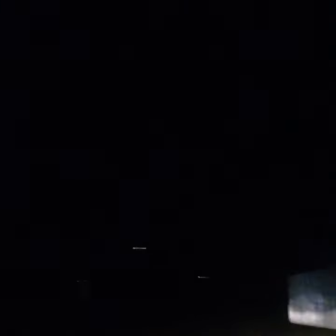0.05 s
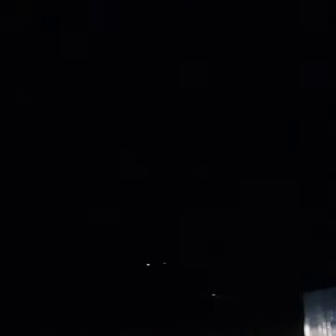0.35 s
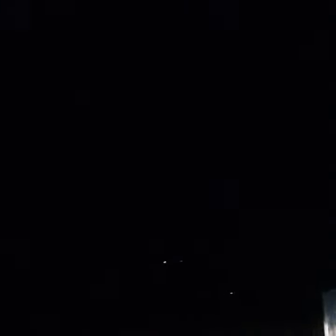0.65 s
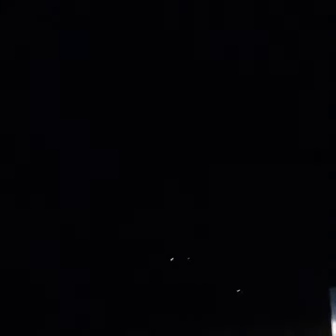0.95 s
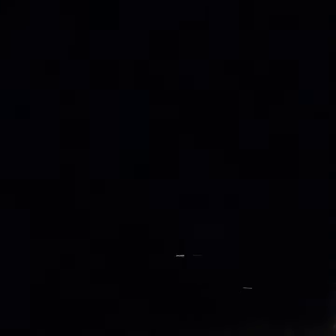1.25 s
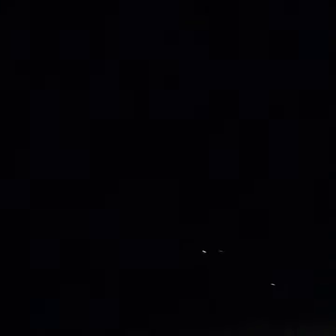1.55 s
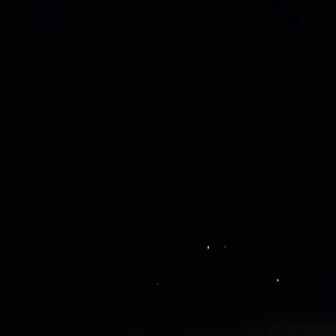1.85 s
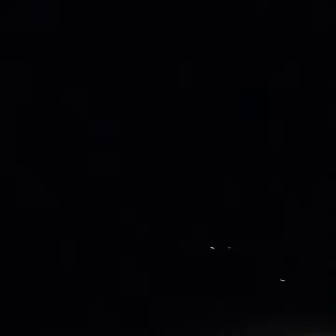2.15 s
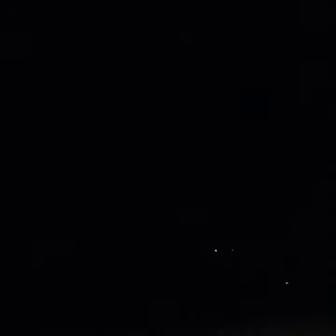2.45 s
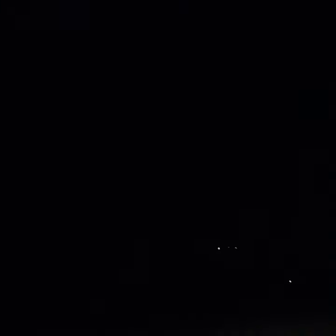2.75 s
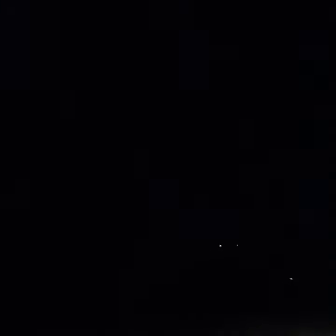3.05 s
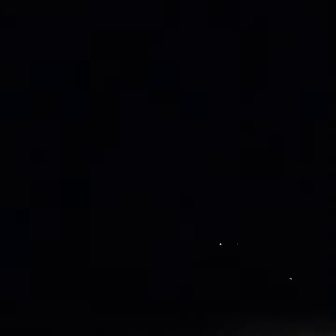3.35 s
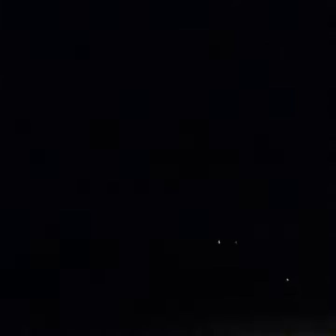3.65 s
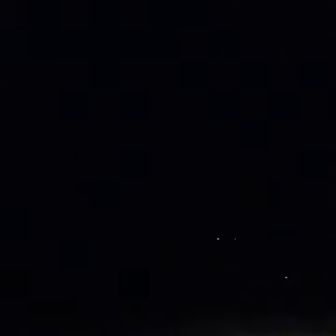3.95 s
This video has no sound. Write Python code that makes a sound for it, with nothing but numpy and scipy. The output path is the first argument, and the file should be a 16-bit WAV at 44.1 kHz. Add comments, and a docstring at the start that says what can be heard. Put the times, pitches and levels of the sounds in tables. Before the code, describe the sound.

A helicopter flies low at night, its rotor blades beating rapidly over a low roar.

```python
"""A rotorcraft flies low at night, some way off over open ground, its blades beating about 21 times a second.
Each blade cuts the wavering tip vortices in a burst of slaps, with a low thud and a deep thump close
behind; a square hit gives a hard crack. The ground reflects and scatters the beats. Behind them churned
air roars and a turbine rush fades, while faint hiss and ticks lie close to the microphone."""
import sys
import numpy as np
from scipy import signal
from scipy.fft import rfft, irfft
from scipy.io import wavfile

SR = 44100
rng = np.random.default_rng(int(sys.argv[2]) if len(sys.argv) > 2 else 0)


def materialize(psi):
    """Save the field psi as 16-bit PCM at rate SR to the path in sys.argv[1].

    A 1-D psi becomes a single channel; in a 2-D psi each row is a channel.
    """
    bounded = np.clip(np.atleast_2d(psi).T, -1, 1)
    quanta = np.round(bounded * 32767).astype(np.int16)
    wavfile.write(sys.argv[1], SR, quanta)


N = 176400

# Strength of each part of the blade beat over time: time_s, relative_level_db
THUMP_LEVELS = [(0.04, -20), (0.57, -23), (0.71, -23), (0.81, -24.5), (1.44, -24), (1.68, -27),
                (1.72, -19.5), (1.92, -23.5), (2.16, -22), (2.3, -23.5), (2.4, -21), (2.69, -35.5),
                (2.78, -21.0), (2.88, -36), (3.03, -17), (3.17, -40), (3.22, -34.5), (3.51, -32.5),
                (3.9, -21), (3.99, -2)]
THUD_LEVELS = [(0.04, -23), (0.57, -20.5), (0.62, -25), (0.86, -17.5), (1.24, -18.5), (1.29, -28),
               (1.48, -26), (1.53, -21.5), (2.06, -30), (2.11, -23), (2.35, -46), (2.4, -28), (2.74, -17.5),
               (2.88, -41.5), (3.22, -20.5), (3.9, -28), (3.94, -36), (3.99, -32)]
SLAP_LEVELS = [(0.04, -23.5), (0.09, -27), (0.14, -26), (0.33, -21.5), (0.86, -19.5), (0.91, -20.5),
               (1.049, -21.5), (1.29, -19.5), (1.44, -20.5), (1.579, -15), (1.72, -21.5), (1.87, -17.5),
               (1.97, -26), (2.11, -15), (2.25, -27.5), (2.4, -15), (2.59, -27), (2.69, -23.5), (2.74, -25),
               (2.98, -17.5), (3.12, -22.0), (3.22, -16), (3.32, -28), (3.46, -17.5), (3.65, -23.0),
               (3.99, -14)]
BARK_LEVELS = [(0.04, -32.5), (0.43, -31), (0.47, -26.5), (0.52, -28.5), (0.81, -28.0), (0.86, -30.5),
               (1.291, -26.5), (1.44, -31.5), (1.58, -28), (1.63, -33), (1.68, -27), (1.72, -38.5),
               (1.87, -28), (1.92, -36.5), (2.01, -25), (2.159, -32.0), (2.4, -25), (2.74, -34.5),
               (2.78, -29), (3.12, -24), (3.36, -29.5), (3.56, -26), (3.701, -28), (3.75, -21.5),
               (3.9, -27.5), (3.99, -23)]
CRACK_LEVELS = [(0.04, -53.5), (0.76, -39.5), (1.238, -52), (1.29, -39), (1.44, -46.5), (1.63, -40.5),
                (1.72, -46.5), (2.25, -47.5), (2.3, -39.5), (2.64, -39.5), (2.69, -45.5), (3.07, -37.5),
                (3.36, -43.5), (3.46, -37), (3.801, -43.5), (3.99, -41.5)]
SNAP_LEVELS = [(0.04, -51.5), (.7, -48), (1.1, -50), (1.95, -51), (2.3, -43.5), (2.6, -44), (2.88, -47),
               (3.07, -42.5), (3.33, -47), (3.5, -47.5), (3.679, -44.5), (3.95, -48)]
# Spectrum of each part of the blade beat: frequency_hz, relative_gain_db
THUMP_SPECTRUM = [(20, -14.5), (40, 1.5), (62, 4), (85, -8), (125, -19.5), (300, -15.5), (800, -87),
                  (8000, -130)]
THUD_SPECTRUM = [(25, -28), (60, -15.5), (85, -0.5), (110, -0.5), (155, -6), (200, -16.5), (400, -35.5),
                 (1000, -63.5), (8000, -125)]
SLAP_SPECTRUM = [(50, -36.5), (120, -9), (170, 0.5), (220, 7), (290, 3.5), (380, -6), (600, -30.5),
                 (2000, -83.5), (10000, -120)]
BARK_SPECTRUM = [(150, -47.5), (380, 1.5), (520, 0.5), (720, 6.5), (900, -2), (1200, -16), (2000, -26.5),
                 (5000, -68.5), (15000, -110)]
CRACK_SPECTRUM = [(300, -13), (900, -1), (1600, 6.5), (1950, 9), (2400, -24.5), (3400, -47.5),
                  (7000, -79.5), (15000, -109)]
SNAP_SPECTRUM = [(1200, 1), (2100, -2.5), (2700, 0), (3600, -5), (4400, -16.5), (5500, -27), (7000, -30),
                 (15000, -92)]
HARD_CRACK_SPECTRUM = [(200, 6.5), (700, 3), (1500, 6), (2100, 2.5), (2600, -7), (3600, -2.5),
                       (4500, -15.5), (5500, -25), (7000, -36.5), (15000, -77.5)]
# Tip vortices that a blade cuts, timed from the middle of its beat: offset_s, relative_level_db
TIP_VORTICES = [(-.0068, -13.5), (-.0043, -8), (-.0026, -9.5), (-.0013, -3), (.0002, -2), (.0021, -6.5),
                (.0033, -9.5), (.0047, -12), (.0072, -12)]
# Square hits of a blade on a vortex: start_s, relative_level_db
SQUARE_HITS = [(0.475, -47.5), (0.7124, -31), (1.2895, -44), (2.3030, -40.5), (2.4001, -34.5), (2.493, -46),
               (3.0733, -32), (3.1219, -27), (3.4102, -38), (3.4581, -38.5), (3.5095, -26), (3.6064, -32.5),
               (3.6540, -30.5), (3.7498, -29)]
# Response of the scattering ground: frequency_hz, gain_db
SCATTER_RESPONSE = [(40, -42.5), (150, -11), (400, -9), (1000, -13), (3000, -30), (8000, -38.5)]
# Spectra of the background noises: frequency_hz, relative_density_db
WASH_SPECTRUM = [(20, -25.5), (32, -2), (60, 1.5), (120, -1), (230, -2.5), (400, -4.5), (520, -15.5),
                 (750, -9.5), (1150, -17.5), (1650, -25.5), (2300, -34), (3200, -40), (4500, -46),
                 (7500, -68), (15000, -69.5)]
TURBINE_SPECTRUM = [(1200, -13), (1700, 0), (2800, 3), (4200, -1), (6000, -7), (9000, -19.5), (15000, -33)]
HISS_SPECTRUM = [(2000, 1), (5500, -1), (7600, -8), (9000, -2.5), (10500, -4), (12300, 2), (15500, -5),
                 (18000, -27)]
TICK_SPECTRUM = [(1500, -11), (4500, 14), (7500, 2), (9000, 9), (13000, 10), (17000, -2)]
# Faint ticks by the right microphone port: start_s, relative_level_db
TICK_EVENTS = [(0.139, -39.5), (1.0742, -39), (2.676, -40), (2.882, -41), (3.1957, -46)]
# Responses of the two microphone ports: frequency_hz, gain_db
LEFT_RESPONSE = [(60, 1.5), (190, 2.5), (480, 0), (720, -4.5), (1100, -10.5), (1400, 1), (1750, 3),
                 (2250, 1.5), (2600, -5.5), (3000, -2.5), (4300, -6.5), (8000, -0.5)]
RIGHT_RESPONSE = [(60, 0), (190, 0), (480, 0.5), (720, -1.5), (1050, 2), (1310, -0.5), (1600, 6.5),
                  (2200, 3.5), (2500, 6.5), (2850, 6), (3300, 1.5), (8000, 3)]

FIRST_BLADE_S, BLADE_GAP_S, GAP_GROWTH_S = .04116, .04802, 4.06e-6
THUMP_GAIN_DB, THUD_GAIN_DB, SLAP_GAIN_DB, BARK_GAIN_DB, SNAP_GAIN_DB = -4, -0.5, 1.5, 3, 2
THUMP_DELAY_S, THUD_LEAD_S, SLAP_LEAD_S, BARK_LEAD_S = 0.0029, 0.0036, 0.004543, 0.001488
WANDER_S, WANDER_DB, UNEVEN_DB = .00075, 2.5, 1.8  # standard deviations over the blades
SLAP_SPAN, SLAP_WANDER = .42, 0.71  # the dull slap's share of the burst length and of the wander
BOUNCE_DELAYS_S, HISS_GAINS_DB, TICK_GAINS_DB = (0.001276, 0.001193), (-74, -56.5), (-12, 2.5)  # left, right
SAMPLES = np.arange(N)
TIME_S = SAMPLES / SR


def blade_times():
    """Blade passage sets the period of the beat, which lengthens very slightly as the craft goes by."""
    count = np.arange(int(N / SR / BLADE_GAP_S))
    return FIRST_BLADE_S + BLADE_GAP_S * count + GAP_GROWTH_S * count ** 2 / 2


def blade_thumps(blades_s):
    """A passing blade radiates low pressure pulses: a rounder thud, then a deep thump."""
    thump = shaped(impulses(blades_s + THUMP_DELAY_S, gain_at(THUMP_LEVELS, blades_s)), THUMP_SPECTRUM)
    thud = shaped(impulses(blades_s - THUD_LEAD_S, gain_at(THUD_LEVELS, blades_s)), THUD_SPECTRUM)
    return from_db(THUMP_GAIN_DB) * thump + from_db(THUD_GAIN_DB) * thud


def vortex_slaps(blades_s):
    """Blade-vortex interaction: each cut radiates a dull slap, a mid bark, a crack and a thin snap."""
    offset_s, level_db = np.transpose(TIP_VORTICES)
    shape = (len(blades_s), len(offset_s))
    drift_s = WANDER_S * vortex_wander(shape)
    swell_db = WANDER_DB * vortex_wander(shape)
    dull_cuts_s = blades_s[:, None] + SLAP_SPAN * offset_s + SLAP_WANDER * drift_s - SLAP_LEAD_S
    dull_weights = from_db(level_db + SLAP_WANDER * swell_db)
    slap = vortex_burst(blades_s, dull_cuts_s, dull_weights, SLAP_LEVELS, SLAP_SPECTRUM)
    cuts_s = blades_s[:, None] + offset_s + drift_s
    weights = from_db(level_db + swell_db)
    bark = vortex_burst(blades_s, cuts_s - BARK_LEAD_S, weights, BARK_LEVELS, BARK_SPECTRUM)
    crack = vortex_burst(blades_s, cuts_s, weights, CRACK_LEVELS, CRACK_SPECTRUM)
    snap = vortex_burst(blades_s, cuts_s, weights, SNAP_LEVELS, SNAP_SPECTRUM)
    bright = from_db(BARK_GAIN_DB) * bark + crack + from_db(SNAP_GAIN_DB) * snap
    uneven_db = UNEVEN_DB * np.interp(TIME_S, blades_s, rng.standard_normal(len(blades_s)))
    return from_db(SLAP_GAIN_DB) * slap + from_db(uneven_db) * bright


def vortex_wander(shape, memory=.45):
    """First-order random process of unit variance: part of the wander carries over to the next blade."""
    return signal.lfilter([np.sqrt(1 - memory ** 2)], [1, -memory], rng.standard_normal(shape), axis=0)


def vortex_burst(blades_s, cuts_s, weights, levels, spectrum):
    """Superposition: one blade's cuts interfere, and their sum is scaled to the level of that beat."""
    beat_starts = ((blades_s - BLADE_GAP_S / 2) * SR).astype(int)
    unscaled = shaped(impulses(cuts_s, weights), spectrum)
    beat_rms = np.sqrt(np.add.reduceat(unscaled ** 2, beat_starts) / (BLADE_GAP_S * SR))
    beat_gain = gain_at(levels, blades_s) / beat_rms
    return shaped(impulses(cuts_s, weights * beat_gain[:, None]), spectrum)


def hard_cracks():
    """Impulsive radiation: a blade meeting a vortex squarely gives one sharp, broadband pulse."""
    start_s, level_db = np.transpose(SQUARE_HITS)
    return shaped(impulses(start_s, from_db(level_db)), HARD_CRACK_SPECTRUM)


def ground_bounce(beat, reflection=0.5, delay_growth_s_per_s=4e-6):
    """Comb filtering: direct and ground-reflected waves interfere, hollowing out evenly spaced bands."""
    delays_s = np.array(BOUNCE_DELAYS_S)[:, None] + delay_growth_s_per_s * TIME_S
    reflected = np.interp(SAMPLES - delays_s * SR, SAMPLES, beat)
    return (beat + reflection * reflected) / (1 + reflection)


def ground_scatter(beat, t60_s=0.1):
    """Diffuse reflection: the land returns a short tail of echoes, renewed as the craft moves on."""
    tail_s = np.arange(SR // 4) / SR
    decay = from_db(-60 * tail_s / t60_s)
    hop = SR // 6
    echoes = np.zeros((2, N + SR))
    for centre in range(0, N + hop, hop):
        span = np.arange(max(centre - hop, 0), min(centre + hop, N))
        window = np.cos(np.pi / 2 * (span - centre) / hop)  # equal-power crossfade between tails
        tail = diffuse_noise(len(tail_s)) * decay / np.sqrt(np.sum(decay ** 2))
        echo = signal.fftconvolve((beat[span] * window)[None], tail, axes=1)
        echoes[:, span[0]:span[0] + echo.shape[1]] += echo
    return filtered(echoes[:, :N], SCATTER_RESPONSE)


def rotor_wash(gain_db=-28.5, growth_db_per_s=0.13):
    """Turbulence: air churned by the rotor radiates a low, fluttering roar."""
    roar = shaped(diffuse_noise(N), WASH_SPECTRUM)
    return from_db(gain_db + growth_db_per_s * TIME_S) * flutter(depth_db=1.5, step_s=0.0065) * roar


def turbine_rush(gain_db=-53.5, fade_db_per_s=3.5):
    """Broadband noise: the turbine's airy rush, uncorrelated between the ports, slowly fades."""
    rush = shaped(rng.standard_normal((2, N)), TURBINE_SPECTRUM)
    return from_db(gain_db - fade_db_per_s * TIME_S) * rush


def microphone_hiss():
    """Noise floor: a thin, slightly flickering hiss, mostly on the right."""
    hiss = shaped(rng.standard_normal((2, N)), HISS_SPECTRUM)
    return from_db(HISS_GAINS_DB)[:, None] * flutter(depth_db=1.7, step_s=.016) * hiss


def faint_ticks(decay_s=.003):
    """Transients: tiny bursts of treble noise decay exponentially by the right port."""
    envelope = np.zeros(N)
    for start_s, level_db in TICK_EVENTS:
        age_s = TIME_S - start_s
        envelope += from_db(level_db) * (age_s >= 0) * np.exp(-abs(age_s) / decay_s)
    return from_db(TICK_GAINS_DB)[:, None] * shaped(envelope * rng.standard_normal((2, N)), TICK_SPECTRUM)


def diffuse_noise(length, crossover_hz=2180):
    """A diffuse field is coherent at the two ports in the bass and uncorrelated in the treble."""
    common, independent = rng.standard_normal((2, length))
    side = signal.sosfilt(signal.butter(1, crossover_hz, "high", fs=SR, output="sos"), independent)
    return np.array([common + side, common - side])


def flutter(depth_db, step_s):
    """Random amplitude modulation: a gain that glides to a new level at each step."""
    return from_db(depth_db * np.interp(TIME_S / step_s, SAMPLES, rng.standard_normal(N)))


def impulses(times_s, gains):
    """Impulse train, scaled so that unit gains at the blade rate give unit rms."""
    index = np.round(np.ravel(times_s) * SR).astype(int)
    inside = (index >= 0) & (index < N)
    train = np.zeros(N)
    np.add.at(train, index[inside], np.ravel(gains)[inside])
    return train * np.sqrt(BLADE_GAP_S * SR)


def filtered(sound, curve, keep_power=False):
    """Minimum-phase filter through (frequency_hz, gain_db) points."""
    frequency_hz, gain_db = np.transpose(curve)
    grid_hz = np.maximum(np.arange(N + 1) * SR / (2 * N), 1)
    magnitude = from_db(np.interp(np.log(grid_hz), np.log(frequency_hz), gain_db))
    cepstrum = irfft(np.log(magnitude))
    cepstrum[1:N] *= 2  # folding onto positive time makes the filter causal
    cepstrum[N + 1:] = 0
    response = np.exp(rfft(cepstrum))
    if keep_power:
        response /= np.sqrt(np.mean(abs(response) ** 2))
    return irfft(rfft(sound, 2 * N) * response)[..., :N]


def shaped(sound, spectrum):
    """Spectral shaping that conserves the power of a white input."""
    return filtered(sound, spectrum, keep_power=True)


def gain_at(levels, times_s):
    """Amplitude along a level curve, interpolated in decibels."""
    return from_db(np.interp(times_s, *np.transpose(levels)))


def from_db(db):
    """Decibels to amplitude ratio."""
    return 10 ** (np.asarray(db) / 20)


def scene(left_lag_s=.00009):
    """Path difference: the craft is to the right, so the left port hears it a little later and duller."""
    blades_s = blade_times()
    beat = blade_thumps(blades_s) + vortex_slaps(blades_s) + hard_cracks()
    left, right = ground_bounce(beat) + ground_scatter(beat) + rotor_wash() + turbine_rush()
    late_left = np.interp(SAMPLES - left_lag_s * SR, SAMPLES, left)
    craft = np.array([filtered(late_left, LEFT_RESPONSE), filtered(right, RIGHT_RESPONSE)])
    return craft + microphone_hiss() + faint_ticks()


def record(dry):
    """Band limiting and soft saturation: the deepest bass and the top are cut, the highest peaks rounded."""
    low_cut_hz, high_cut_hz, peak_limit, fade_s = 16, 15800, .98, .002
    highpassed = signal.sosfilt(signal.butter(2, low_cut_hz, "high", fs=SR, output="sos"), dry)
    rounded = highpassed / (1 + (highpassed / peak_limit) ** 6) ** (1 / 6)
    fade_out = np.minimum((N - SAMPLES) / (fade_s * SR), 1)
    return fade_out * signal.sosfilt(signal.ellip(10, .1, 80, high_cut_hz, fs=SR, output="sos"), rounded)


dry = scene()
out = record(dry)
materialize(out)
```